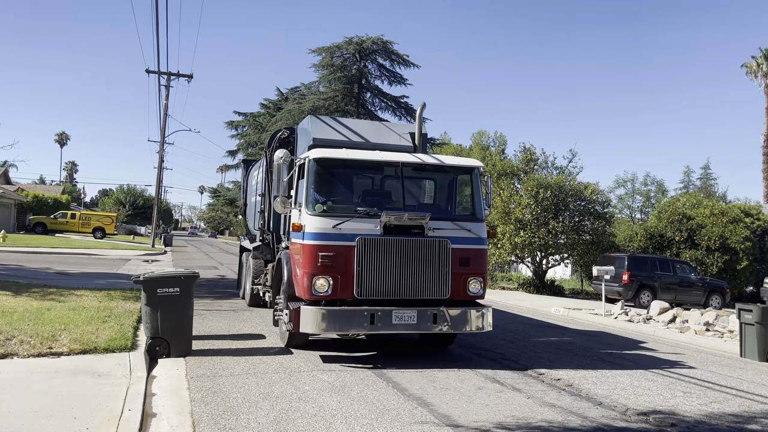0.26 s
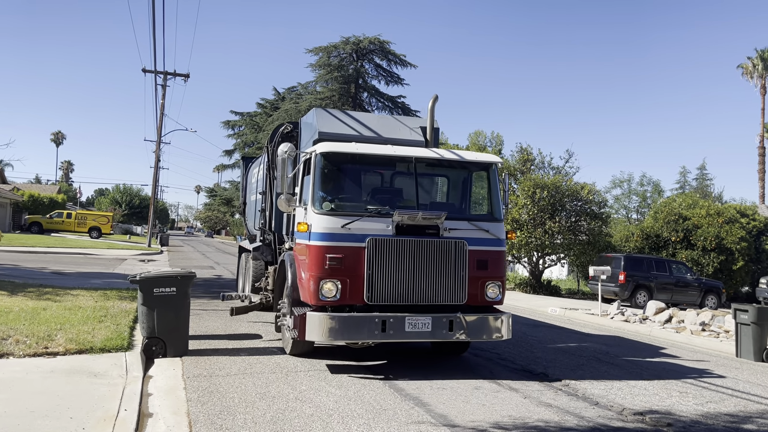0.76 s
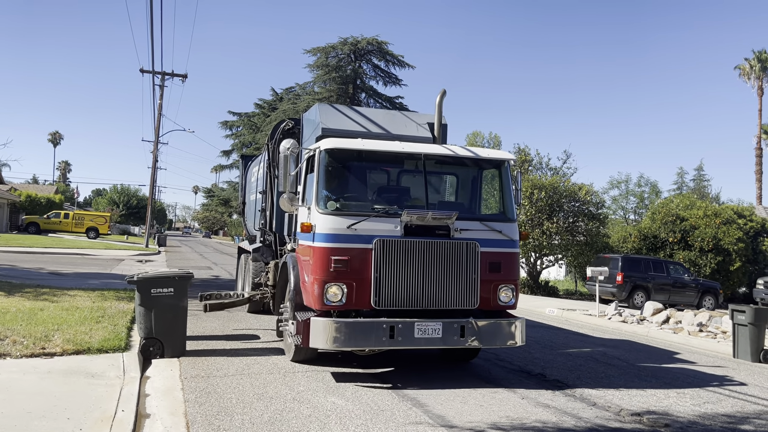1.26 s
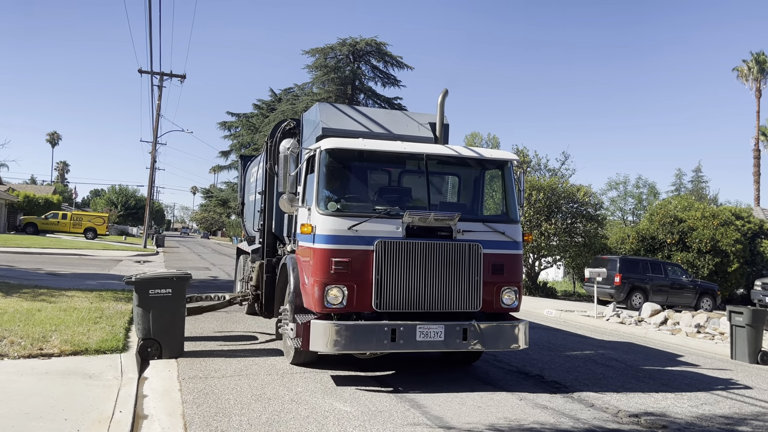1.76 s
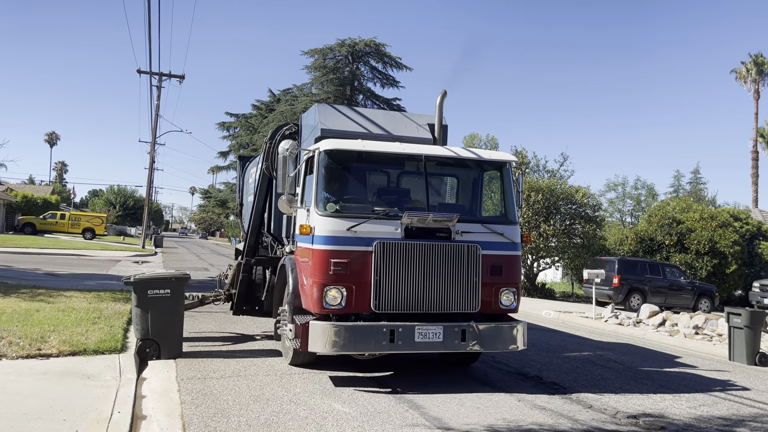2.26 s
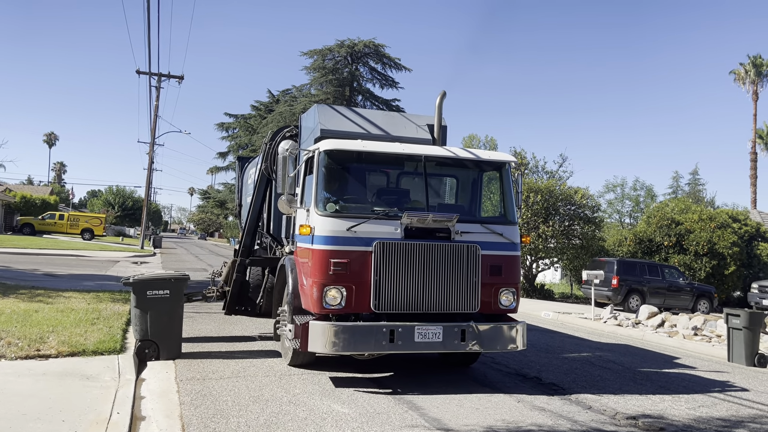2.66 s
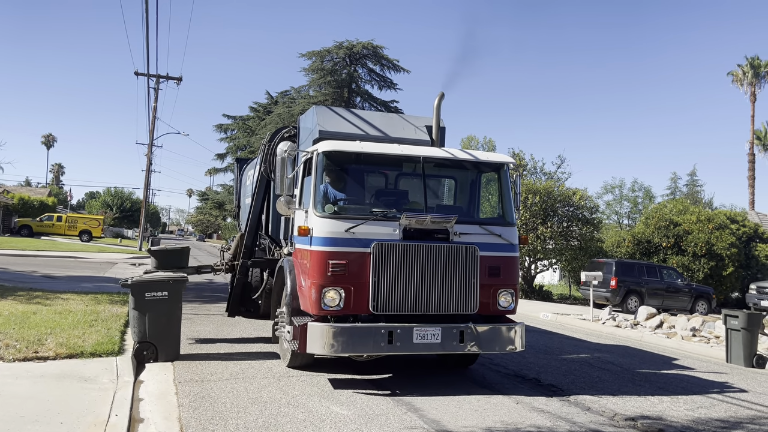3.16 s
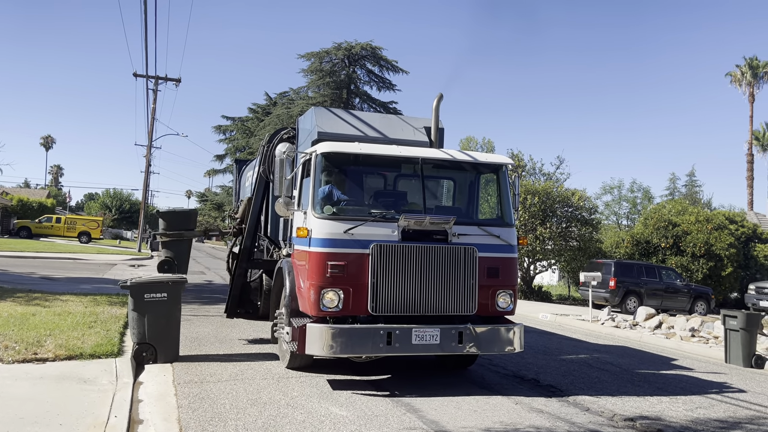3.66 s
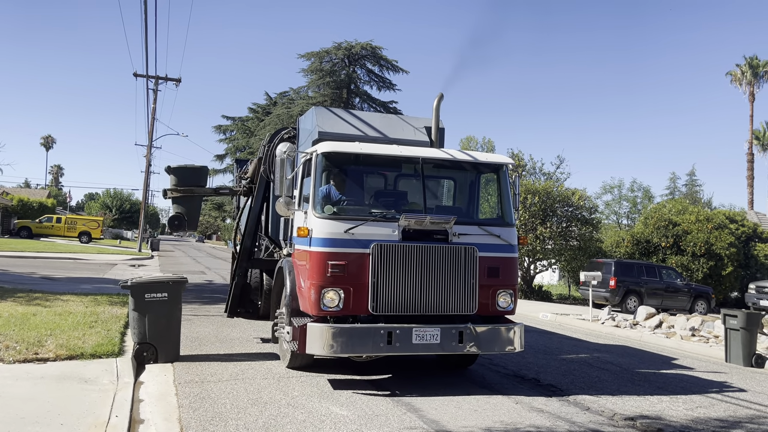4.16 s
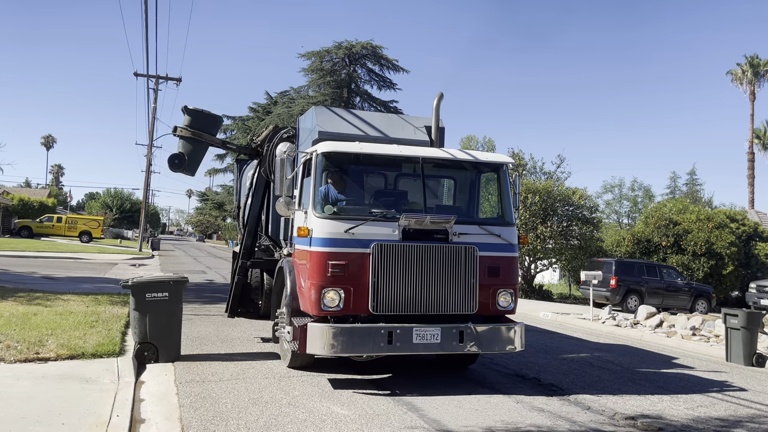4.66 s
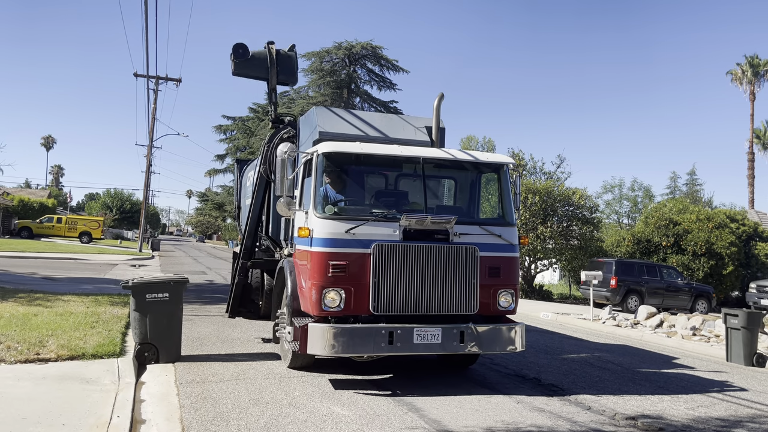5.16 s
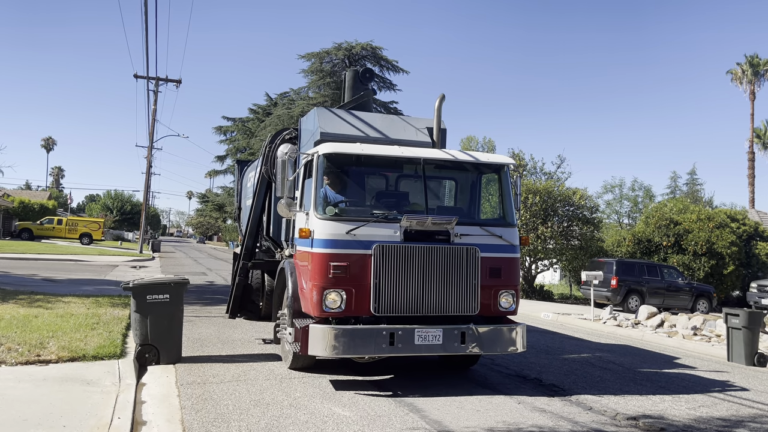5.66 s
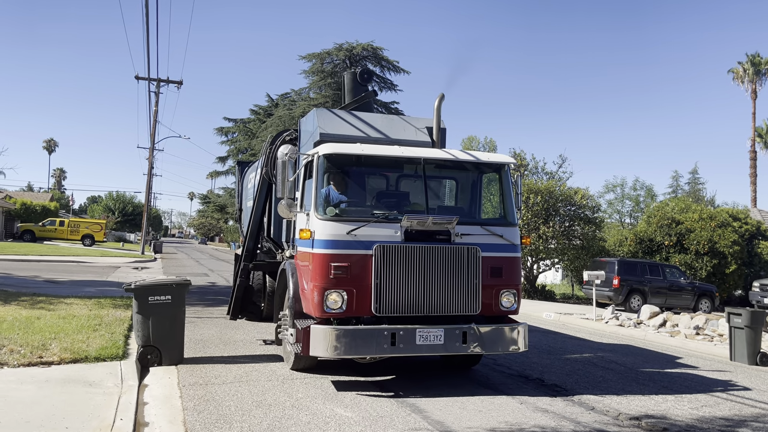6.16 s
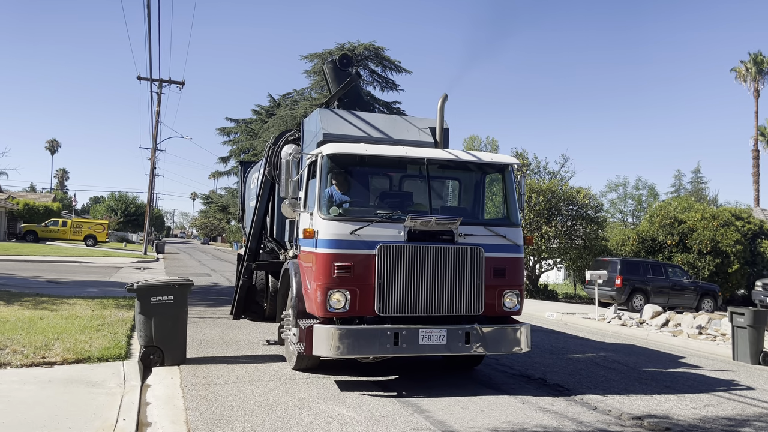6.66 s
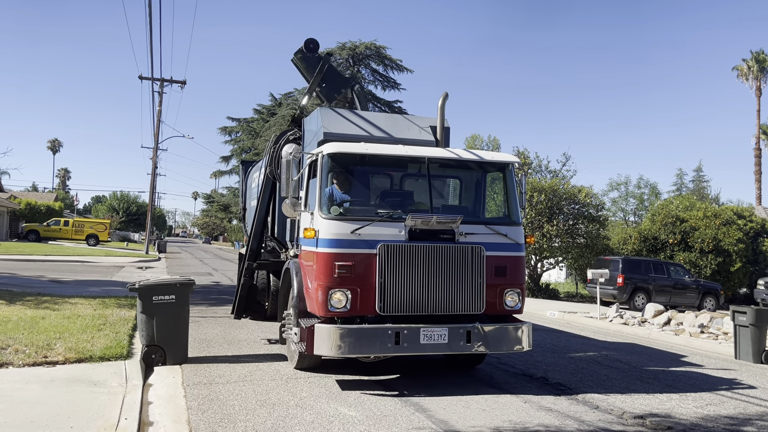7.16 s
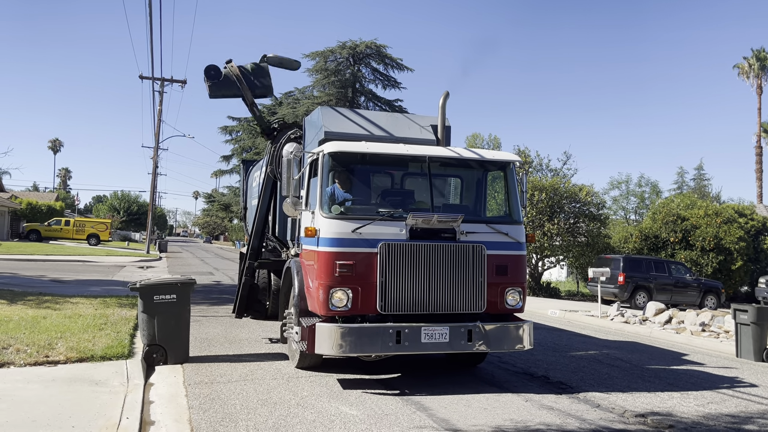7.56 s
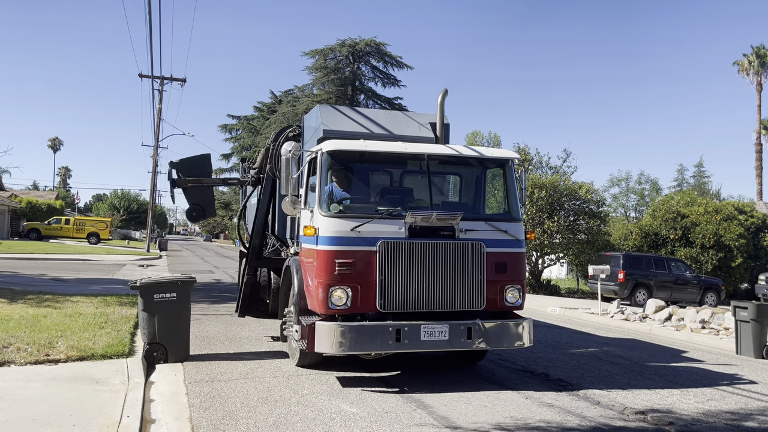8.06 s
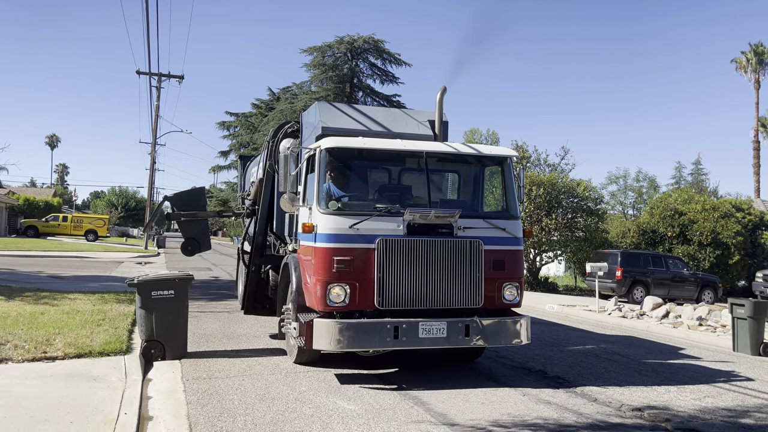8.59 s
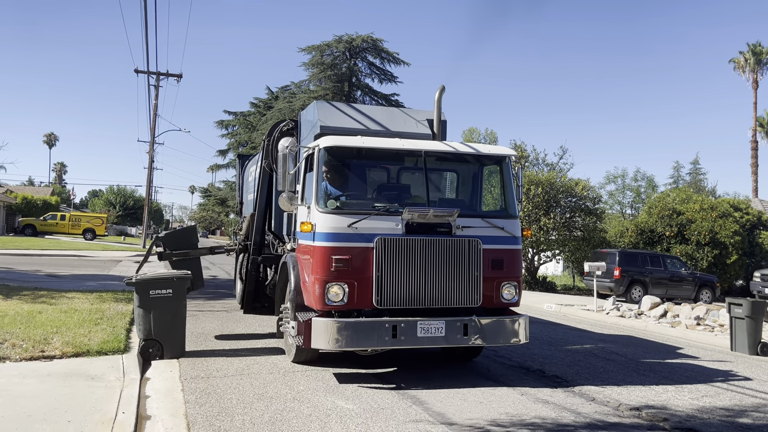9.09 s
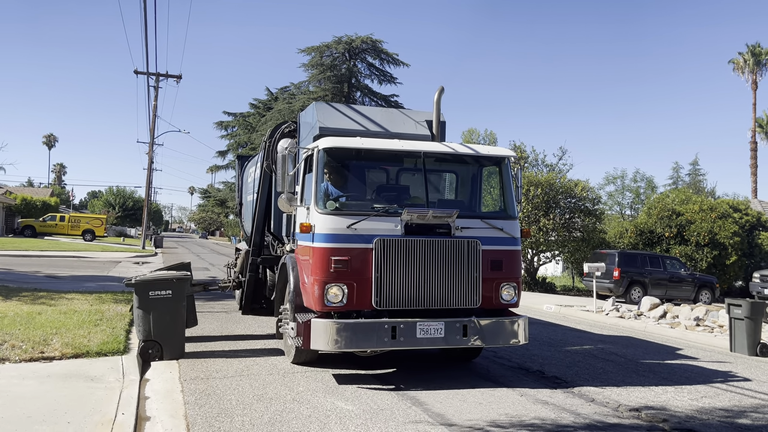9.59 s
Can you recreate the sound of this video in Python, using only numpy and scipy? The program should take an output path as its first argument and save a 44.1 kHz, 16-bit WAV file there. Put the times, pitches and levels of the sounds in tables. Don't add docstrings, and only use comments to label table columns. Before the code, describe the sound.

Rough diesel engine close by, shrill brake squeal, then surging revs and pump whine, sharp hollow cart knocks, rattling steel and hissing air.

```python
import sys
import numpy as np
from scipy import signal
from scipy.fft import rfft, irfft, next_fast_len
from scipy.io import wavfile
from scipy.ndimage import uniform_filter1d

SR = 44100
rng = np.random.default_rng(int(sys.argv[2]) if len(sys.argv) > 2 else 0)


def convert_level_to_amplitude(level_db):
    exponent = np.asarray(level_db, float) / 20
    return 10 ** exponent


def wav_out(sig):
    wavfile.write(sys.argv[1], SR, np.round(np.clip(np.atleast_2d(sig).T, -1, 1) * 32767).astype(np.int16))


N = 433414
PADDED = next_fast_len(N + 4096)


def rms_one(x):
    return x / np.sqrt(np.mean(x ** 2) + 1e-20)


def in_time(rows):
    s, *columns = np.transpose(rows)
    return [np.interp(np.arange(N) / SR, s, column) for column in columns]


def at_hz(points):
    hz, value = np.transpose(points)
    bins_hz = np.fft.rfftfreq(PADDED, 1 / SR)
    return np.interp(np.log(bins_hz + 1), np.log(hz), value)


def drift(rate_hz):
    r = np.exp(-80 * np.pi * rate_hz / SR)
    slow = signal.lfilter([1], [1, -2 * r, r * r], rng.standard_normal(N // 40 + 1002))[1000:]
    return np.interp(np.arange(N) / 40, np.arange(len(slow)), rms_one(slow))


def ring(x, hz, t60):
    r, w = convert_level_to_amplitude(-60 / (t60 * SR)), 2 * np.pi * hz / SR
    return signal.lfilter([0, np.sin(w)], [1, -2 * r * np.cos(w), r * r], x)


def noise(spectrum, envelope):
    draws = envelope * rng.standard_normal((3, N))
    return rfft(draws, PADDED) * rms_one(convert_level_to_amplitude(at_hz(spectrum)))


def add(out, start_s, hz, level):
    at = round(start_s * SR)
    fade = signal.windows.tukey(len(hz), .25)
    tone = np.sqrt(2) * level * fade * np.sin(2 * np.pi * np.cumsum(hz) / SR)
    out[at:at + len(hz)] += tone


def add_wavering(out, tones, waver_hz):
    pitch, level = drift(14), drift(33)
    for k, (start, length, first_hz, last_hz, db) in enumerate(tones):
        size, own = round(length * SR), k * 10000
        hz = np.linspace(first_hz, last_hz, size) + waver_hz * pitch[own:own + size]
        add(out, start, hz, convert_level_to_amplitude(db + 4.5 * level[own:own + size]))


# start in seconds, level in dB, time to fall 60 dB in seconds.
AIR_PUFFS = [
    (.6, -53, .5),
    (2.48, -40, 0.65),
    (2.52, -34, 1.1),
    (5.571, -37, 0.22),
    (7.84, -24, 0.083),
    (7.867, -36, .5),
    (8.332, -33, 0.12),
    (9.3, -49, 1.5),
    (9.55, -41, 1.5),
]


def puffs():
    t = np.arange(N) / SR
    return sum(convert_level_to_amplitude(db - 60 * np.maximum(t - s, 0) / t60) * (t >= s) for s, db, t60 in AIR_PUFFS)


# start in seconds, length in seconds, first pitch in Hz, last pitch in Hz, level in dB.
FRAME_DRONES = [
    (2.7, 0.97, 150, 173.3, -30.5),
    (3.8, 0.81, 178, 161, -29.5),
    (6.2, 0.72, 170, 160, -27),
    (1.7, 0.3, 154, 161.3, -24),
    (2.845, 0.194, 302.5, 301, -23.5),
    (3.499, 0.54, 300, 318, -32),
]


def frame():
    out = np.zeros(N)
    add_wavering(out, FRAME_DRONES, waver_hz=5.7)
    return out


# start in seconds, length in seconds, pitch in Hz, level in dB.
STEADY_SQUEALS = [(.47, .32, 9850, -26), (.78, .1, 9840, -36), (.5, .2, 10350, -42), (.72, .08, 10385, -42),
                  (.84, .26, 10325, -43), (.52, .11, 11050, -47), (.74, .18, 11580, -46),
                  (.83, .37, 9270, -36), (.99, .2, 8935, -36), (.86, .59, 7780, -44),
                  (1.12, .2, 10490, -25), (1.16, .08, 9955, -38), (1.23, .19, 9610, -34),
                  (1, .08, 9910, -43), (1.12, .08, 11490, -47), (.85, .13, 10990, -50),
                  (1.02, .08, 10815, -47), (1.44, .09, 6715, -31), (1.04, .09, 5390, -41)]
# start in seconds, length in seconds, first pitch in Hz, last pitch in Hz, level in dB.
SLIDING_SQUEALS = [(.5, .1, 9320, 9120, -44), (.8, .12, 9900, 10020, -44), (1.07, .04, 10150, 10250, -45),
                   (1.3, .06, 10500, 9900, -42), (1.32, .12, 11620, 11750, -46),
                   (1.46, .25, 11800, 12100, -53), (1, .04, 12000, 11900, -44),
                   (1.61, .1, 10080, 10160, -43), (1.28, .1, 5330, 5000, -36), (.4, .1, 13100, 13000, -52),
                   (1.19, .13, 15200, 15500, -30)]
# start in seconds, length in seconds, first pitch in Hz, last pitch in Hz, level in dB.
AXLE_GROAN = (.8, .48, 408, 417, -28.5)


def brakes():
    out = np.zeros(N)
    steady = [(start, length, hz, hz, db) for start, length, hz, db in STEADY_SQUEALS]
    add_wavering(out, steady, waver_hz=10)
    add_wavering(out, SLIDING_SQUEALS, waver_hz=20)
    start, length, first_hz, last_hz, db = AXLE_GROAN
    glide = np.linspace(0, 1, round(length * SR)) ** 2
    add(out, start, first_hz + (last_hz - first_hz) * glide, convert_level_to_amplitude(db))
    return out


# start in seconds, hollow thump in dB, clang in dB, crack in dB, ring pitch in Hz.
CART_BLOWS = [
    (5.5286, -18.5, -29, -33, 2920),
    (5.5478, -19, -28, -26, 4300),
    (5.5716, -14, -19.5, -21.5, 1400),
    (5.589, -16, -21, -21, 4340),
    (7.8397, -11.5, -15, -17.5, 1380),
    (7.866, -12, -18.5, -23, 3260),
    (7.888, -19, -27, -21, 3900),
    (8.331, -22, -25.5, -24, 3940),
]
# start in seconds, level in dB, ring pitch in Hz, time to fall 60 dB in seconds.
ARM_CLANGS = [(0.701, -34, 2760, 0.16), (0.976, -32, 1970, 0.13), (1.47, -30, 1950, 0.16),
              (2.271, -18, 1460, 0.13), (2.475, -27, 1400, 0.33), (5.6153, -20, 2300, 0.17),
              (5.643, -21.5, 2090, 0.2), (5.7, -29, 2170, 0.17), (5.76, -37, 2420, 0.17),
              (7.708, -28, 1520, 0.15), (7.75, -31, 2480, 0.12)]
# start in seconds, level in dB, ring pitch in Hz, time to fall 60 dB in seconds.
LOOSE_RATTLES = [(0.5954, -29.5, 4360, 0.48), (.66, -31.5, 3250, .27), (1.395, -34, 4300, 0.38),
                 (1.441, -34, 4500, 0.21), (2.011, -38, 6400, .045), (2.32, -29, 3700, 0.084),
                 (2.499, -30, 6570, .5), (2.679, -36, 4030, 0.37), (5.0825, -39, 3210, 0.043),
                 (5.664, -27.5, 4600, 0.24), (5.722, -27.5, 3830, 0.12), (7.826, -29, 3840, .1),
                 (7.919, -24.5, 3640, 0.23), (7.954, -29.5, 4400, 0.27), (7.992, -29, 4330, 0.38),
                 (8.192, -26.5, 4450, .15), (8.376, -33, 3870, 0.16)]
BLOW_T60_S = 0.15
CLANG_TO_SHEET_DB, RATTLE_TO_ARM_DB = -6.5, -1
UNSTRUCK_DB = -60


def contacts():
    blows = [(*row, BLOW_T60_S) for row in CART_BLOWS]
    clangs = [(s, UNSTRUCK_DB, db, db + CLANG_TO_SHEET_DB, hz, t60) for s, db, hz, t60 in ARM_CLANGS]
    rattles = [(s, UNSTRUCK_DB, db + RATTLE_TO_ARM_DB, db, hz, t60) for s, db, hz, t60 in LOOSE_RATTLES]
    return blows + clangs + rattles


# pitch in Hz, level in dB, time to fall 60 dB in seconds.
CART_MODES = [(346, 0, 0.028), (427, -4, 0.041), (530, -5, 0.051), (605, 3.5, 0.011), (822, -0.5, 0.04),
              (890, -6, 0.013)]
ARM_MODES = [(1274, 3.5, 0.0083), (1520, 8, 0.006), (1840, 9.2, 0.0038), (2100, -3.5, 0.021),
             (2910, 1.5, 0.002)]
SHEET_MODES = [(3330, -1, 0.0068), (4130, 2.8, 0.0064), (4400, 0.5, 0.005), (6280, 2.5, 0.0017),
               (8100, 5, 0.0006), (10800, -17, 0.00083)]


def body_sound(modes):
    click = np.eye(1, 4000)[0]
    body = sum(convert_level_to_amplitude(db) * (-1) ** k * ring(click, hz, t60) for k, (hz, db, t60) in enumerate(modes))
    return rfft(body / np.sqrt(np.sum(body ** 2)), PADDED)


OWN_RING_DB, OWN_RING_CYCLES = -21, 45
PING_T60_S, PING_DB = .05, 22


def knocks():
    size, events = 12000, contacts()
    firsts = ([0, 1, 2], [0, 40, 75])
    strikes, rings, t = np.zeros((3, 3, N)), np.zeros((3, N)), np.arange(size) / SR
    shape = (len(events), 3, size)
    grain = rng.standard_normal(shape) * (rng.random(shape) < .1) * 3
    for (s, *levels_db, ring_hz, t60), clicks in zip(events, grain):
        clicks = clicks * convert_level_to_amplitude(-60 * t / max(t60, .01))
        clicks[firsts] = 7.0
        at = round(s * SR)
        strikes[:, :, at:at + size] += convert_level_to_amplitude(np.array(levels_db) + 2.0)[:, None, None] * clicks
        heavy = ring_hz < 2800
        share_db = levels_db[1 if heavy else 2] + OWN_RING_DB + 5.6 * heavy + PING_DB * (t60 < PING_T60_S)
        own_ring = ring(clicks, ring_hz, OWN_RING_CYCLES / ring_hz)
        rings[:, at:at + size] += convert_level_to_amplitude(share_db) * np.sqrt(ring_hz / 3000) * own_ring
    bodies = [body_sound(modes) for modes in (CART_MODES, ARM_MODES, SHEET_MODES)]
    struck = sum(rfft(strike, PADDED) * body for strike, body in zip(strikes, bodies))
    return rfft(rings, PADDED) + struck


# time in seconds, firings per second.
ENGINE_SPEED = [(0, 40), (1.5, 41), (1.9, 48), (2.3, 43), (3, 72), (3.55, 88.7), (3.97, 95), (4.2, 87.5),
                (4.55, 83), (5.4, 43), (5.8, 44), (6.15, 84), (6.45, 91.5), (7.85, 46), (8.35, 85),
                (9.1, 103), (9.45, 101), (9.83, 70)]


def firing_rate():
    return in_time(ENGINE_SPEED)[0]


# start in seconds, hardest push in seconds, end in seconds, level in dB.
PUMP_PUSHES = [
    (2.55, 2.95, 3.3, -30),
    (3.3, 3.8, 4.58, -19.5),
    (6.1, 6.33, 6.5, -21),
    (8.25, 8.9, 9.3, -27),
    (9.15, 9.42, 9.68, -26.5),
]
PULSES_PER_FIRING = 3
PUMP_EASE_DB = 5


def pump():
    out, per_s = np.zeros(N), firing_rate()
    for start, hardest, end, db in PUMP_PUSHES:
        at = np.arange(round(start * SR), round(end * SR))
        level_db = np.interp(at / SR, [start, hardest, end], [db - PUMP_EASE_DB, db, db - PUMP_EASE_DB])
        add(out, start, PULSES_PER_FIRING * per_s[at], convert_level_to_amplitude(level_db))
    return out


IDLE_BEAT, BEAT_FALL = 0.4, 2


def firing_swell(turns, octaves):
    strength = convert_level_to_amplitude(1.6 * rng.standard_normal(1000))[turns.astype(int)]
    burst = strength * np.exp(-3.5 * (turns % 1))
    depth = np.clip(IDLE_BEAT / 2 ** (BEAT_FALL * octaves), 0, 1)
    swell = 1 + depth * (rms_one(burst) * 0.45 - .45)
    return swell / np.sqrt(uniform_filter1d(swell ** 2, size=4000))


# time in seconds, fuel load in dB, turbo boost in dB.
ENGINE_EFFORT = [(0, -25.5, -64.5), (1.3, -24, -60), (1.89, -20.5, -58.5), (2.2, -25, -58),
                 (2.8, -16, -50.5), (3.94, -17.5, -48.5), (4.15, -20.5, -50.5), (4.5, -22.5, -52.5),
                 (5.25, -33, -58), (5.5, -29.5, -55.5), (5.72, -24, -59.5), (6.35, -17.5, -51),
                 (6.85, -26, -56.5), (7.3, -23.5, -53.5), (7.75, -29, -58.5), (8.8, -20, -53),
                 (9.4, -20.5, -44.5), (9.83, -27.5, -49.5)]
ORDER_LEVELS = [-12, -4.5, 0, -10]
# frequency in Hz, level in dB per Hz.
EXHAUST_COLOUR = [(22, -40), (36, -30), (48, -16), (80, -5), (110, -10), (170, -0.5), (225, -6.5),
                  (285, -4), (400, -11.5), (480, -19), (700, -35), (1500, -70)]
BLOCK_COLOUR = [(150, -60), (300, -18), (480, -8.5), (640, -2), (820, 1.5), (950, -3.5), (1060, -11),
                (1500, -9.5), (2000, -17.5), (2200, -12.5), (2500, -21.5), (2950, -10), (3600, -18.5),
                (6000, -56)]
HISS_COLOUR = [(1500, -45), (2500, -28), (3600, -2), (4300, 0), (5400, -3.5), (6500, -0.5), (7100, -5.5),
               (8500, -8.5), (10000, -15), (12000, -60)]
TURBO_COLOUR = [(4000, -50), (6500, -11), (8600, -6.5), (9500, 1.5), (10600, -1), (11700, -4),
                (12500, -10.5), (13300, -22), (16000, -40)]
IDLE_PER_S = 40
CLATTER_DB_PER_OCTAVE, ORDERS_DB_PER_OCTAVE = 2, -6.5
HISS_LOAD_SHARE, HISS_BOOST_SHARE = 0.5, 0.5
ORDERS_LOAD_SHARE = 1.44
PUFF_TO_HISS_DB = 4


def engine():
    per_s, (load_db, boost_db) = firing_rate(), in_time(ENGINE_EFFORT)
    octaves = np.log2(per_s / IDLE_PER_S)
    turns = np.cumsum(per_s * (1 + .006 * drift(8))) / SR
    swell, air = firing_swell(turns, octaves), puffs()

    roar = noise(EXHAUST_COLOUR, convert_level_to_amplitude(load_db - 0.4 + 0.71 * drift(8.0)))
    clatter_db = load_db - 1.77 + CLATTER_DB_PER_OCTAVE * octaves + 0.45 * drift(19.6)
    roar += noise(BLOCK_COLOUR, convert_level_to_amplitude(clatter_db) * swell)
    hiss_db = HISS_LOAD_SHARE * load_db + HISS_BOOST_SHARE * boost_db + 2.5 + 0.6 * drift(24)
    roar += noise(HISS_COLOUR, np.hypot(convert_level_to_amplitude(hiss_db) * swell, convert_level_to_amplitude(PUFF_TO_HISS_DB) * air))
    roar += noise(TURBO_COLOUR, np.hypot(convert_level_to_amplitude(boost_db + 14.5 + 0.81 * drift(15)), air))

    orders_db = ORDERS_LOAD_SHARE * load_db + 4.5 + ORDERS_DB_PER_OCTAVE * octaves
    tones = np.zeros(N)
    for k, db in enumerate(ORDER_LEVELS):
        tones += convert_level_to_amplitude(orders_db + db + 3.06 * drift(4.3)) * np.sin(2 * np.pi * (k + 1) * turns + k)
    return roar, np.sqrt(2) * tones


def scattered(x, t60):
    t = np.arange(3000) / SR
    smear = rng.standard_normal((2, len(t))) * convert_level_to_amplitude(-60 * t / t60)
    smear = smear / np.sqrt(np.sum(smear ** 2, axis=1, keepdims=True))
    direct = rfft(x, PADDED)
    return np.vstack([direct, direct * rfft(smear, PADDED)])


# frequency in Hz, left minus right in dB.
PORT_LEAN = [(60, 1), (330, 0.4), (550, 8), (800, 1.5), (1100, 7), (1600, 7.5), (1900, -0.5), (2350, -6),
             (3000, -1.5), (5500, -1), (6500, 6.5), (7050, -2), (8500, -0.5), (9000, 1)]
# frequency in Hz, likeness of the ports from 0 to 1.
PORT_LIKENESS = [(60, 1), (400, 0.94), (540, 0.6), (800, 0.97), (1100, 0.75), (1700, 0.51), (2950, 0.9),
                 (3500, 0.67), (4600, 0.073), (8400, 0.22), (8900, 0.79), (10200, 0.99), (11300, 0.73),
                 (11900, 0.96)]
# frequency in Hz, how far the right port leads in radians.
PORT_LEAD = [(300, 0.14), (520, -1.5), (620, -0.83), (1100, -0.5), (1350, 1.43), (1800, 1.37), (2350, 1.5),
             (2600, -2), (3500, -3), (5800, -11.5), (8600, -13), (10050, -9), (10330, -10), (11750, -5)]


def ports(direct, *scatter):
    like, side = np.clip(at_hz(PORT_LIKENESS), 0, 1), np.array([[1], [-1]])
    shared = np.sqrt(like) * direct * np.exp(-.5j * side * at_hz(PORT_LEAD))
    own = np.sqrt(1 - like) * np.array(scatter)
    return irfft(convert_level_to_amplitude(side * at_hz(PORT_LEAN) / 2) * (shared + own), PADDED)[:, :N]


def scene():
    roar, engine_tones = engine()
    tones = engine_tones + pump() + brakes() + frame()
    return ports(*(roar + knocks() + scattered(tones, t60=.012)))


def band_limit(x):
    return signal.sosfilt(signal.butter(12, 16930, fs=SR, output="sos"), x)


def record(dry):
    top_cut = signal.butter(10, 12700, fs=SR, output="sos")
    rounded = 1.517 * np.tanh(dry / 1.492)
    return band_limit(signal.sosfilt(top_cut, rounded))


dry = scene()
out = record(dry)
wav_out(out)
```